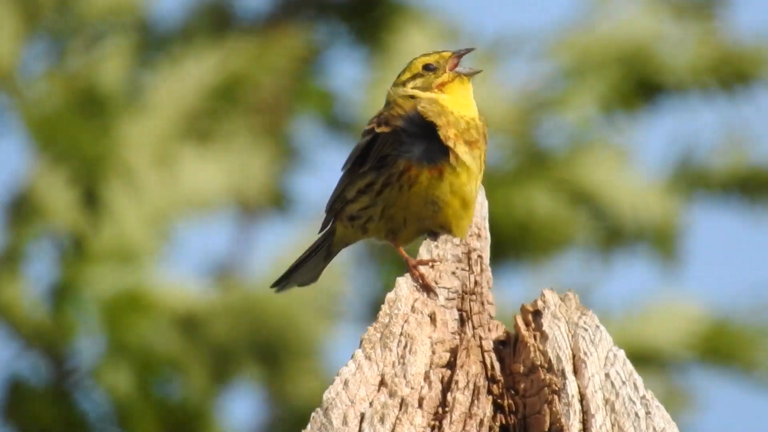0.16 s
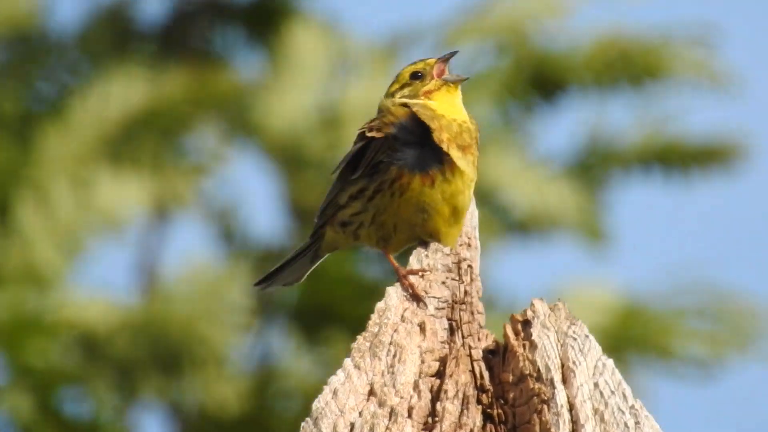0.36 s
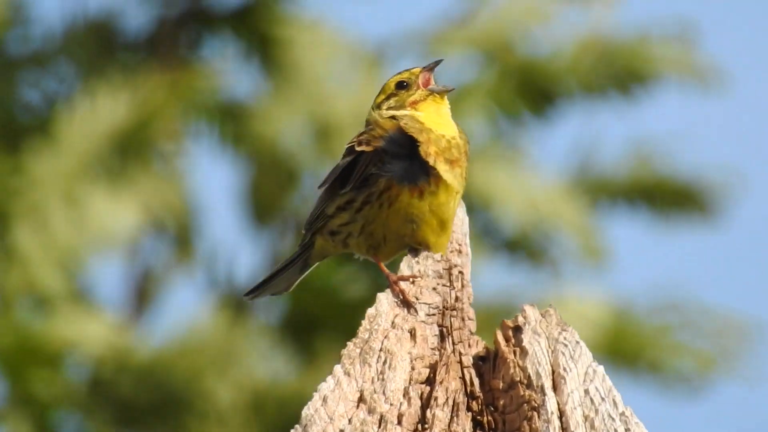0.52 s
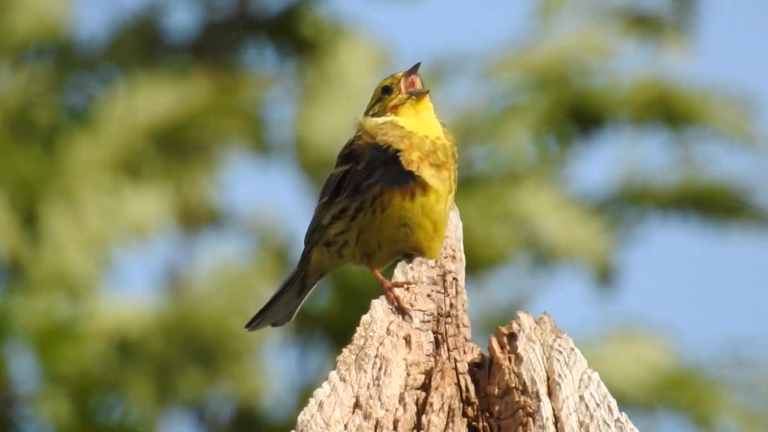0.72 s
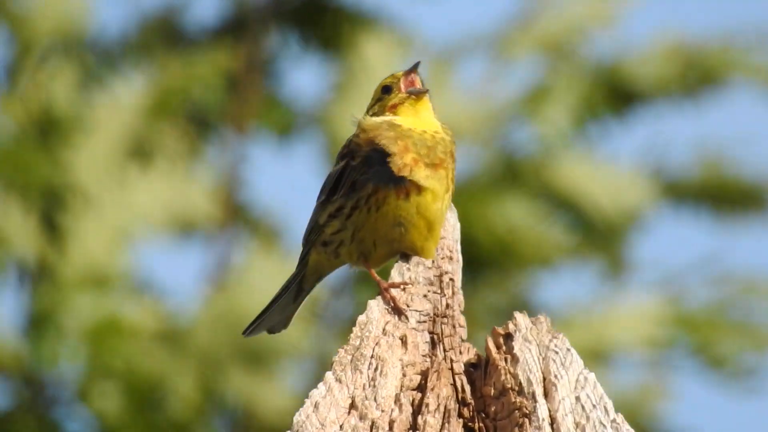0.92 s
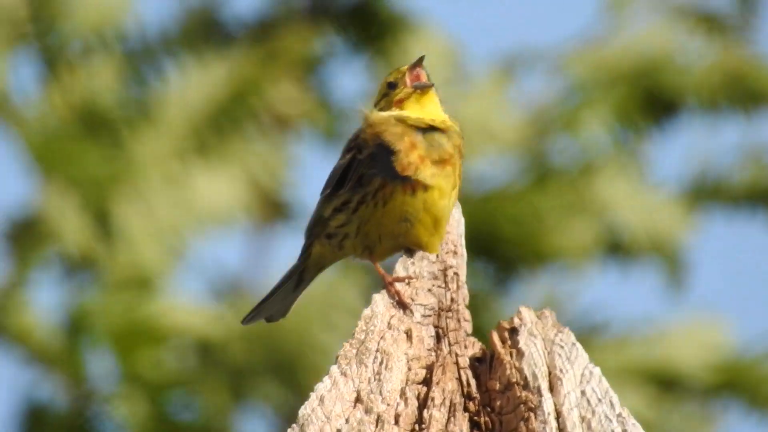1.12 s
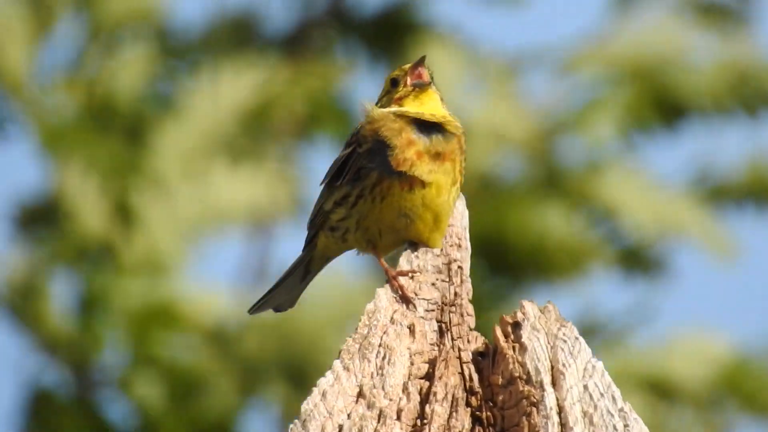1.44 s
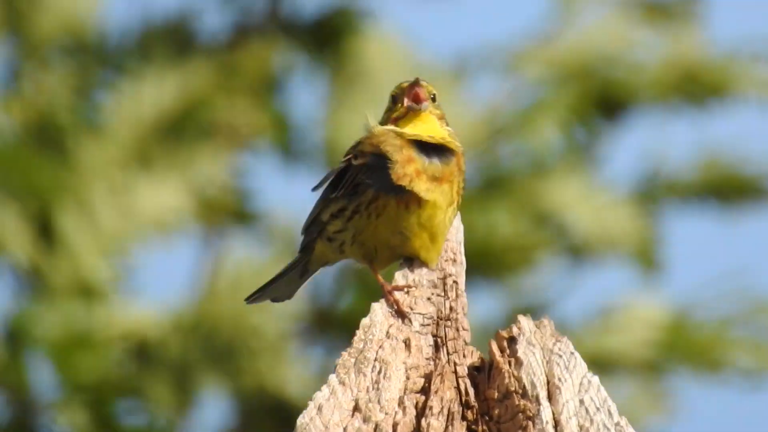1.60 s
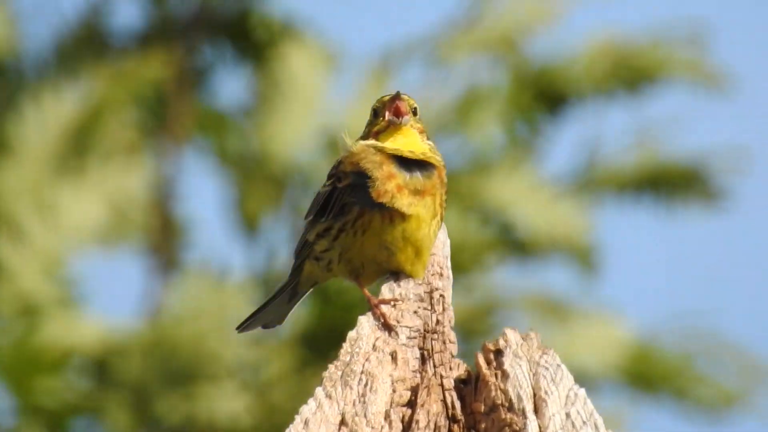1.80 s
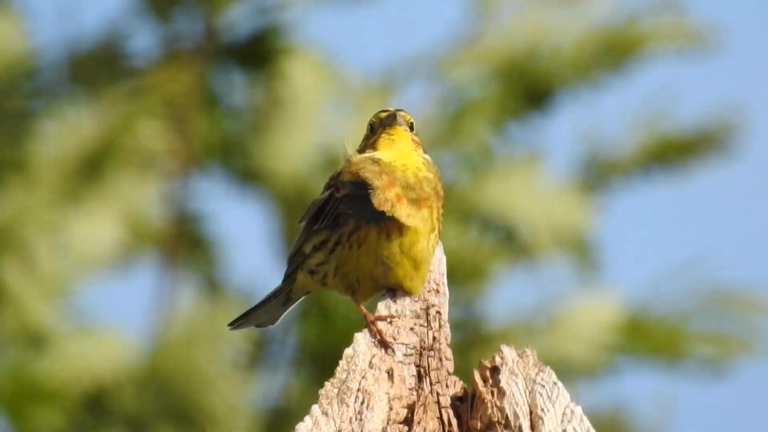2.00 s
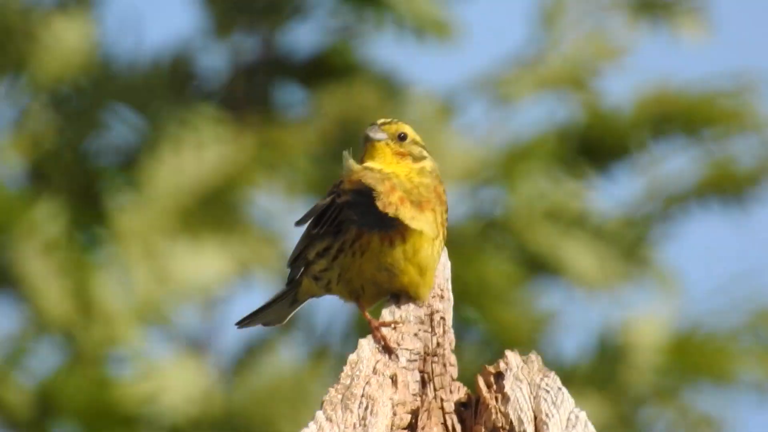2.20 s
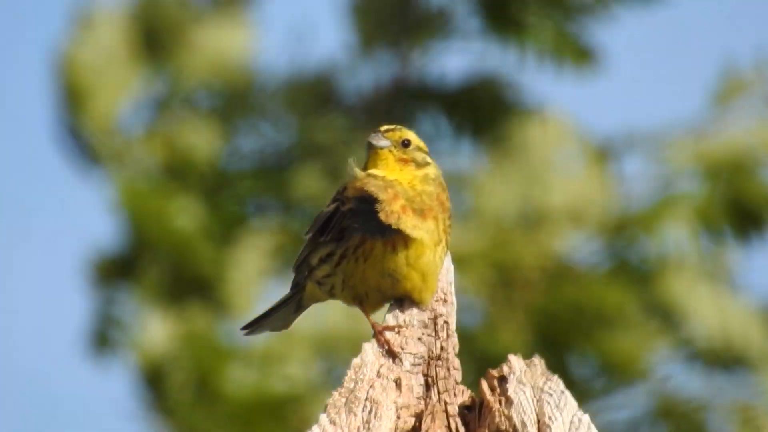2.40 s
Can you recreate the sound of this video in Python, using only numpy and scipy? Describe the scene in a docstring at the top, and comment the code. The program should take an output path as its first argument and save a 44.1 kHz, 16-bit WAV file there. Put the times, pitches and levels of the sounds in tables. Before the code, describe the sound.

A close yellowhammer sings eight fast pairs of notes, a thin trill flicking upward then a lower throbbing tone, growing louder, then a buzzy wheeze; faint outdoor rush and distant bird twitter behind, in stereo.

```python
"""A soft outdoor rush and a thin, distant twitter are there from the start: both are shaped noise.
A yellowhammer on a stump sings eight pairs of notes, each a high trill ending in an upward flick, then a
lower throbbing note; both are wavering tones. Their echoes from the perch and leaves follow at once.
The low rush swells briefly here and there, and faint gliding tones chirp from about 1.3 s on.
From about 1.5 to 2 s the song ends in a rough, falling buzz of three fluttering tones."""
import sys
import numpy as np
from scipy import signal
from scipy.fft import rfft, irfft
from scipy.io import wavfile
from scipy.ndimage import map_coordinates

SR = 44100
rng = np.random.default_rng(int(sys.argv[2]) if len(sys.argv) > 2 else 0)


def file_out(sig):
    """Save sig as 16-bit WAV at sys.argv[1]."""
    # one column per channel
    cols = np.atleast_2d(sig).T
    # limit, then scale
    lim = np.clip(cols, -1, 1)
    pcm = np.round(lim * 32767).astype(np.int16)
    wavfile.write(sys.argv[1], SR, pcm)


N = 112454
T = np.arange(N) / SR  # time of every sample, s
BIN_HZ = np.arange(N // 2 + 1) * SR / N + 1e-9  # frequencies of the spectrum; never quite zero


def undb(db):
    """Turn decibels into a gain."""
    return 10 ** (np.asarray(db) / 20)


def unit(x):
    """Scale to an average strength (rms) of 1."""
    return x / np.sqrt(np.mean(x ** 2))


def noise(gain):
    """Noise of rms 1 whose spectrum follows gain(Hz)."""
    spectrum = rfft(rng.standard_normal(N))
    return unit(irfft(spectrum * gain(BIN_HZ), N))


def band(hz, width_hz):
    """Bell-shaped band of noise of rms 1; centred on zero it is a random wander."""
    return noise(lambda f: np.exp(-.5 * ((f - hz) / width_hz) ** 2))


def colour(points, hz):
    """Gain from a table of frequency and dB, joined by straight lines over log frequency."""
    f, db = np.array(points).T
    return undb(np.interp(np.log(hz), np.log(f), db))


def curve(rows, axis=1):
    """One column of a table, joined by straight lines in time."""
    rows = np.array(rows)
    return np.interp(T, rows[:, 0], rows[:, axis])


def turn(hz):
    """Running phase, in radians, of a steady or changing frequency."""
    return 2 * np.pi * np.cumsum(hz + np.zeros(N)) / SR


def gate(start, end, edge_s):
    """On between two times, with soft edges."""
    opening = 1 + np.tanh((T - start) / edge_s)
    closing = 1 + np.tanh((end - T) / edge_s)
    return opening * closing / 4


def pan(x, db):
    """Place a sound in stereo, the left louder than the right by db."""
    return x * unit(undb(np.array([[db], [-db]]) / 2))


def air():
    """Soft outdoor rush: noise, wide in the treble, whose bass, middle and treble drift in level."""
    # colour of the rush before it is scaled to rms 1: f/Hz, level per Hz/dB
    air_colour = [(20, -37.5), (55, -9.5), (100, -13.5), (150, -7.5), (230, -7.5), (370, -10), (450, -13),
                  (620, -14.5), (880, -10), (1300, -15), (2300, -19.5), (4300, -19), (6500, -20),
                  (8000, -25.5), (11000, -29.5), (15500, -37)]
    # left-right difference against the common part: f/Hz, side minus mid/dB
    air_width = [(50, -4.5), (200, -3), (600, -6.5), (1500, -3), (5000, -2.5), (14000, -2)]
    # gain of each range: t/s, bass/dB, middle/dB, treble/dB
    air_levels = [(0, -50.5, -56.5, -53.5), (.35, -57, -55, -55), (.47, -51, -59.5, -56.5),
                  (.66, -65, -55, -57), (.75, -65, -55, -56.5), (1.05, -77, -53.5, -56.5),
                  (1.53, -70.5, -54, -55), (1.85, -66.5, -53.5, -54.5), (2.1, -59.5, -55, -55),
                  (2.35, -52.5, -55.5, -54), (2.55, -56, -55, -55)]
    mid = rfft(noise(lambda f: colour(air_colour, f)))
    side = rfft(noise(lambda f: colour(air_colour, f)))
    both = mid + np.array([[1], [-1]]) * side * colour(air_width, BIN_HZ)
    bass = 1 / (1 + (BIN_HZ / 110) ** 4)
    below_treble = 1 / (1 + (BIN_HZ / 1400) ** 4)
    shares = bass, below_treble - bass, 1 - below_treble
    return sum(irfft(both * share, N) * undb(curve(air_levels, axis=column))
               for column, share in enumerate(shares, start=1))


def far_birds():
    """A thin, flickering twitter of narrow noise, and faint rising chirps blurred by distance."""
    # distant twitter: t/s, level/dB
    twitter_levels = [(0, -54), (.8, -57.5), (1.43, -54), (1.9, -51), (2.04, -57.5), (2.13, -51.5),
                      (2.25, -64), (2.4, -54), (2.55, -69)]
    # distant chirps: t/s, length/s, first f/Hz, last f/Hz, level/dB
    chirp_table = [(1.256, 0.032, 3150, 3900, -59.5), (1.833, 0.019, 3120, 3900, -50.5),
                   (2.122, 0.051, 3660, 4600, -58), (2.287, 0.042, 3800, 4550, -60),
                   (2.31, 0.0164, 3180, 3680, -59), (2.38, 0.033, 3200, 4460, -55.5),
                   (2.414, 0.017, 3190, 3700, -57)]
    flicker_db = 2.5 * band(0, 37)
    two_ears = np.array([band(4907, 180) for _ in range(2)])
    twitter = undb(curve(twitter_levels) + flicker_db) * two_ears
    blur = 1 + .5 * band(0, 71)
    chirps = 0
    for start, length, from_hz, to_hz, db in chirp_table:
        hz = np.interp(T, [start, start + length], [from_hz, to_hz])
        chirps = chirps + undb(db) * np.sin(turn(hz)) * blur * gate(start, start + length, .005)
    return chirps + twitter


def whistle(hz, waver_hz, loud, throat_hz):
    """A wavering tone with a trace of its octave, passed through a throat resonance tuned to its pitch."""
    octave_db = -56
    offset_hz = np.fft.fftfreq(N, 1 / SR)  # distance from the pitch
    throat = 1 / np.sqrt(1 + (offset_hz / throat_hz) ** 6)
    # a complex number for each moment holds both the loudness and the waver
    shape = np.fft.ifft(np.fft.fft(loud * np.exp(1j * turn(waver_hz))) * throat)
    phase = turn(hz) + np.angle(shape)
    tone = np.sin(phase) + undb(octave_db) * np.sin(2 * phase)
    return np.sqrt(2) * np.abs(shape) * tone


def high_notes():
    """Fast, wide trills of pitch and loudness that slow, swell and end in a loud upward flick."""
    # high lead-ins: flick t/s, length/s, f/Hz, trill level/dB, flick level/dB
    high_table = [(.003, .04, 6550, -57, -35.5), (0.186, 0.045, 6580, -43.5, -36.5),
                  (0.372, 0.043, 6620, -33.5, -34.5), (.554, 0.045, 6670, -34.5, -27.5),
                  (0.74, 0.043, 6634, -34, -27), (0.923, 0.04, 6505, -36, -21.5),
                  (1.109, 0.044, 6656, -31, -25), (1.295, 0.043, 6650, -29, -21)]
    trill_rate_hz, slows_hz_per_s, swing_hz, trill_depth = 183, 1500, 300, 0.54
    swell_db = 8  # the trill starts this far down
    flick_s, flick_mid_hz, flick_hz_per_s = 0.0027, 6860, 130000
    wander_hz = 70 * band(0, 500)
    drift = 0.012 * band(0, 60)
    out = 0
    for end, length, hz, trill_db, flick_db in high_table:
        age = T - end  # time since the middle of the flick
        rate_hz = trill_rate_hz - slows_hz_per_s * np.clip(age, -length, 0)
        cycle = turn(rate_hz * (1 + drift))
        trill_hz = swing_hz * np.sin(cycle) + wander_hz
        flick_hz = flick_mid_hz - hz + flick_hz_per_s * np.clip(age, -flick_s, flick_s)
        into_flick = gate(end - 2.6 * flick_s, T[-1], 0.00092)
        waver_hz = trill_hz + into_flick * (flick_hz - trill_hz)
        swell = undb(trill_db - swell_db * np.clip(-age / length, 0, 1) ** 2)
        trill = swell * (1 + trill_depth * np.cos(cycle)) / (1 + trill_depth / 2)
        flick = undb(flick_db) * np.exp(-(age / flick_s) ** 2)
        loud = trill * gate(end - length, end - flick_s, 0.0053) + flick
        soft_start = gate(0.00096, T[-1], 0.0008)
        out = out + whistle(hz, waver_hz, loud * soft_start, throat_hz=456)
    return pan(out, -4)


def echo(x, lag_s, db):
    """One late, weaker copy."""
    return undb(db) * map_coordinates(x, [(T - lag_s) * SR])


def near_reflections(centre):
    """Single echoes from the perch and branches reach each ear at slightly different times."""
    # echoes: left delay/s, left level/dB, right delay/s, right level/dB
    reflection_table = [(.0011, -13.5, .0017, -17.5), (.0043, -9.5, .0034, -5.5),
                        (.0082, -20.5, .0074, -13)]
    return sum(np.array([echo(centre, left_s, left_db), echo(centre, right_s, right_db)])
               for left_s, left_db, right_s, right_db in reflection_table)


def scatter(x, db, t60_s):
    """Diffuse echo from foliage: a fading noise tail, different at each ear, 60 dB down after t60_s."""
    tail = rng.standard_normal((2, N)) * undb(-60 * T / t60_s) * (T > .003)
    tail = unit(tail) / np.sqrt(N)
    return undb(db) * signal.fftconvolve(x[None], tail, axes=1)[:, :N]


def low_notes():
    """Swelling notes that throb in loudness and slide upward in each throb, closed by a snap."""
    # low notes: t/s, length/s, last strong throb t/s, f/Hz, slide within a throb/Hz, throb depth (0-1),
    # level/dB, closing snap level/dB, left minus right/dB
    low_table = [(.023, 0.075, .094, 5250, 204, 0.86, -36, -65, 7),
                 (0.198, 0.088, .285, 5206, 170, 1, -27.5, -82, 10),
                 (.380, 0.097, .469, 5154, 127, 1, -21.5, -43, 11.5),
                 (0.563, .097, .654, 5120, 115.4, 0.97, -18.5, -53.5, 10),
                 (0.749, 0.095, .838, 5143, 111, 0.62, -20.5, -46, 8),
                 (0.936, 0.09, 1.019, 5123, 91.3, 0.56, -19.5, -57.5, 5.5),
                 (1.116, 0.1, 1.207, 5138, 85, 0.66, -17.5, -53.5, 8),
                 (1.303, 0.1, 1.393, 5090, 70, 0.62, -24, -46, 5.5)]
    throb_rate_hz, quickens_hz_per_s, throb_shape = 77, 5, 0.94  # later notes throb faster
    swell_s, swell_db, release_s = 0.058, 21.5, 0.0022
    snap_s = .002
    wander_hz = 28 * band(0, 250)
    crackle = band(5900, 1200)
    uneven = undb(0.55 * band(0, 50))
    out = 0
    for start, length, last, hz, slide_hz, depth, db, snap_db, pan_db in low_table:
        age = T - start
        cycle = 2 * np.pi * (throb_rate_hz + quickens_hz_per_s * start) * (T - last)
        throb = 1 - depth * np.abs(np.sin(cycle / 2)) ** (2 * throb_shape)
        swell = undb(db - swell_db * np.clip(1 - age / swell_s, 0, 1) ** 2)
        loud = throb * swell * gate(start, start + length, release_s) * uneven
        tone = whistle(hz, wander_hz + slide_hz * np.sin(cycle), loud, throat_hz=480)
        # the snap peaks 3.4 ms before the note's end
        snap = undb(snap_db) * np.exp(-((age - length + 0.0034) / snap_s) ** 2) * crackle
        out = out + pan(tone + snap, pan_db)
    return out


def swells():
    """The low rush rises briefly here and there: short bumps of narrow noise."""
    # swells: middle t/s, half-length/s, f/Hz, width/Hz, level/dB
    swell_table = [(0.461, 0.069, 204, 29.6, -60.5), (0.586, 0.039, 230, 30.2, -56.5),
                   (1.22, 0.032, 221, 71.5, -57.5), (1.54, 0.073, 350, 45.3, -58),
                   (2.163, 0.025, 201, 35, -60)]
    return sum(undb(db) * np.exp(-((T - at) / length) ** 2) * band(hz, width_hz)
               for at, length, hz, width_hz, db in swell_table)


def buzz():
    """Three rough strands share one fast flutter and beat together; the weight sinks from top to lowest."""
    # the strands of the buzz, each: t/s, f/Hz, level/dB
    low_strand = [(1.49, 5500, -60), (1.559, 5524, -46.5), (1.641, 5593, -40), (1.71, 5510, -33.5),
                  (1.78, 5463, -27.5), (1.814, 5394, -35), (1.858, 5355, -29), (1.97, 5328, -27.5),
                  (2.003, 5440, -37), (2.018, 5390, -74)]
    mid_strand = [(1.48, 5920, -58), (1.52, 5870, -44.5), (1.58, 5920, -37), (1.649, 5920, -41.5),
                  (1.73, 5870, -36.5), (1.84, 5840, -38.5), (1.97, 5700, -36.5), (2.003, 5840, -38.5),
                  (2.017, 5860, -61)]
    top_strand = [(1.462, 6580, -68), (1.48, 6610, -50.5), (1.551, 6446, -38.5), (1.61, 6410, -37),
                  (1.68, 6540, -46.5), (1.78, 6280, -63), (1.99, 6300, -62), (2.015, 6400, -61)]
    # pitch waver of the low, middle and top strand: swing/Hz, roughness/Hz, slow blur/Hz
    flutter_table = [(136, 78, 25.2), (140, 78, 55), (190, 127, 52.6)]
    rate_hz, jitter, depth, rasp_db = 174, 0.036, 0.4, -14
    cycle = turn(rate_hz * (1 + jitter * band(0, 83)))
    strands = low_strand, mid_strand, top_strand
    out = 0
    for strand, (swing_hz, rough_hz, blur_hz) in zip(strands, flutter_table):
        waver_hz = swing_hz * np.sin(cycle) + rough_hz * band(242, 126) + blur_hz * band(0, 98)
        rasp = undb(rasp_db) * band(480, 170)
        flutter = 1 + depth * np.cos(cycle) + rasp
        loud = flutter * undb(curve(strand, axis=2)) * gate(strand[0][0], strand[-1][0], .003)
        out = out + whistle(curve(strand), waver_hz, loud, throat_hz=450)
    return pan(out, -.5)


def scene():
    """The song, its reflections and the countryside behind it."""
    background = air() + far_birds() + swells()
    song = high_notes() + low_notes() + buzz()
    centre = song.mean(axis=0)
    leaves = scatter(centre, db=-9, t60_s=0.056)
    trees = scatter(centre, db=-26.5, t60_s=0.74)
    return song + near_reflections(centre) + leaves + trees + background


def record(dry):
    """A steep low-pass filter cuts off the top of the treble."""
    top_hz = 15750
    return signal.sosfilt(signal.ellip(10, .1, 80, top_hz, fs=SR, output="sos"), dry)


dry = scene()
out = record(dry)
file_out(out)
```